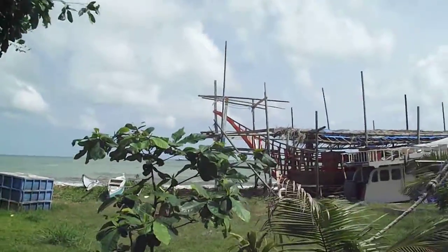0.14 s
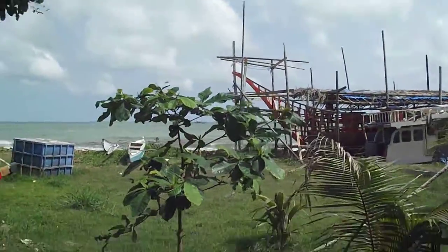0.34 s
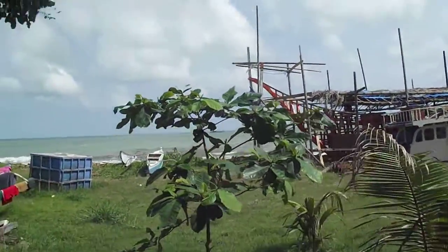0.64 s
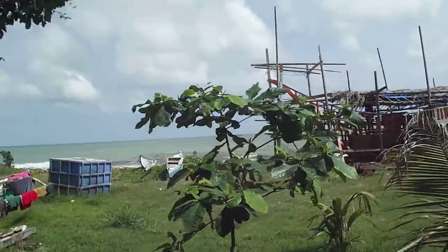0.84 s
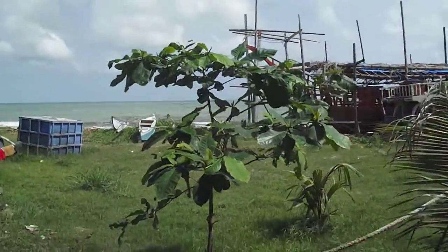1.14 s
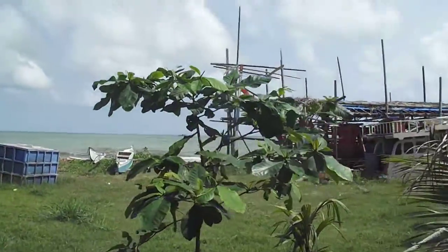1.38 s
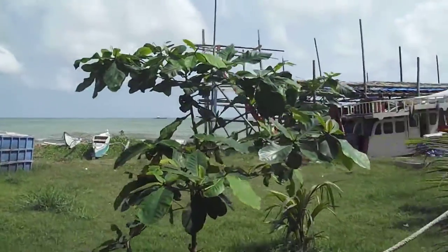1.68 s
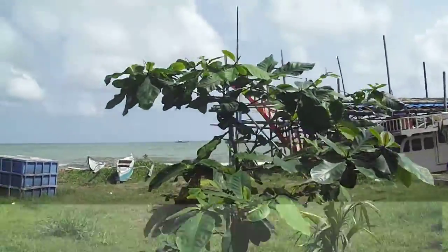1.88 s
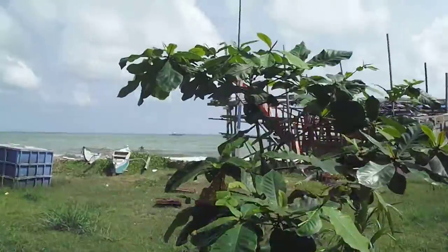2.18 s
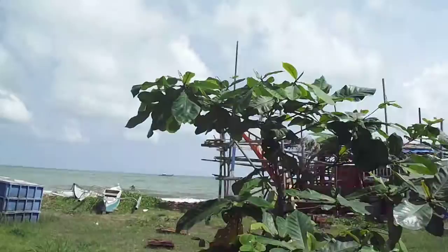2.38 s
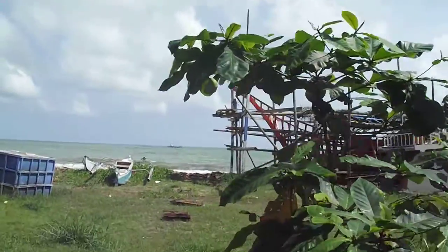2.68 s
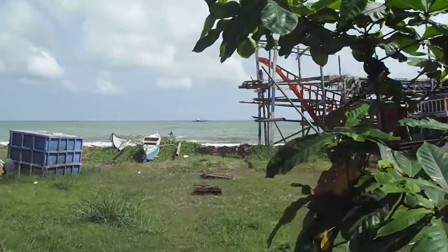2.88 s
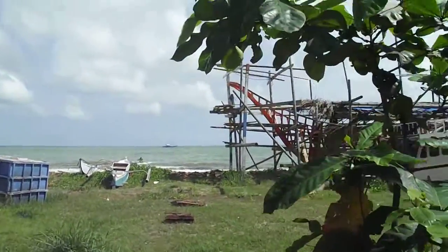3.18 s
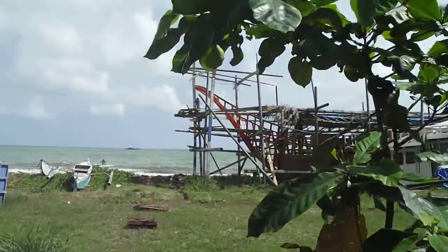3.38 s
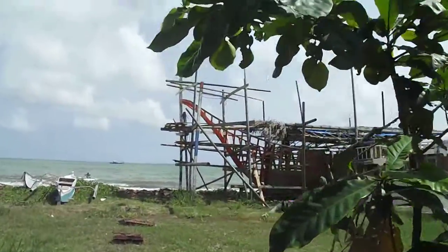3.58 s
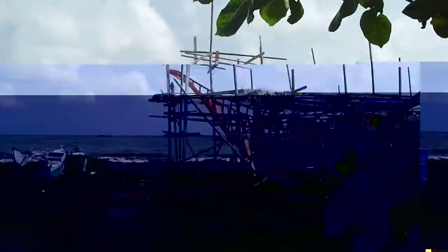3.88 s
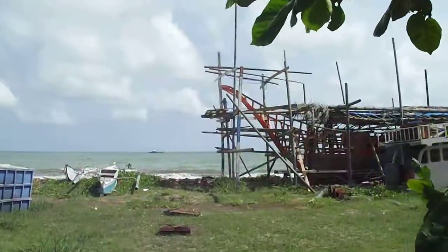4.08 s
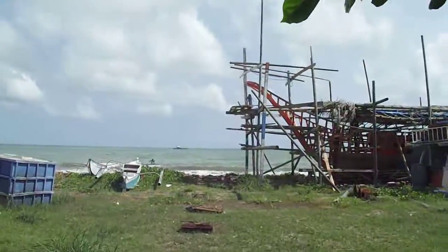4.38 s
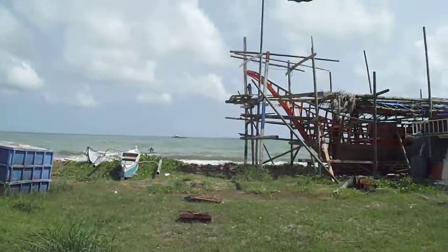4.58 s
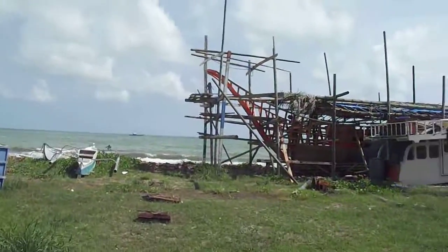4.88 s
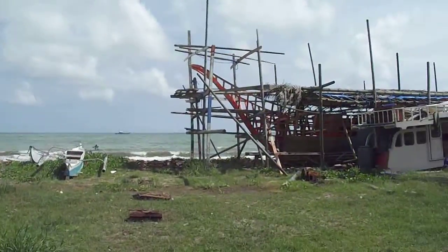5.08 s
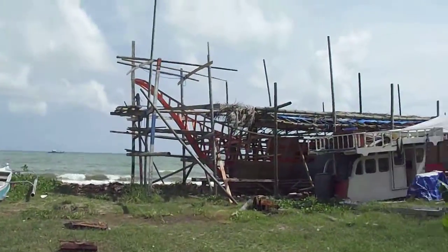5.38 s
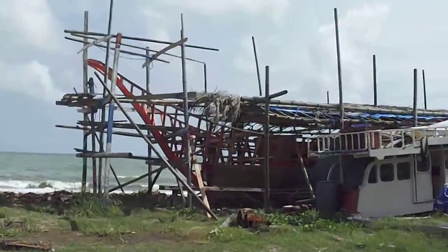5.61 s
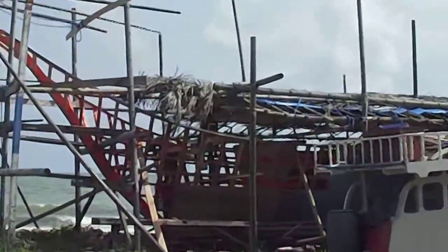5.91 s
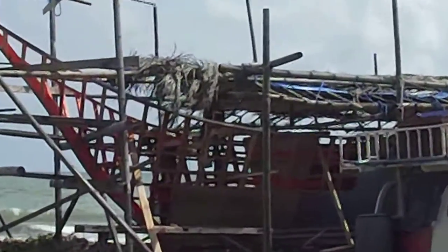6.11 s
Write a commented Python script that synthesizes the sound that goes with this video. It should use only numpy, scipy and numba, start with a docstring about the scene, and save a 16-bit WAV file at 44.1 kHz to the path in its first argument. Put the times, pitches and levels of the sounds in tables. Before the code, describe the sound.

Beside the shore, hammering cracks on boat timber every 0.6 seconds, then stops, leaving steady surf, a piercing drone and fingers clicking and rubbing the microphone's casing.

```python
"""Hammering on a wooden hull by the shore

Someone hammers on the timbers: ringing modes, a noisy crack and a short tail of scattered echoes.
Surf is shaped noise with a high drone from the ringing microphone port; wind is low rumble and thumps.
Fingers rub, click and squeak on the small camera: bursts of tiny slips ring its casing, squeaks are tones.
The camera's gain control ducks after loud knocks, and peaks above full scale are cut flat."""
import sys
import numpy as np
from scipy import signal
from scipy.fft import rfft, irfft, next_fast_len
from scipy.io import wavfile
from scipy.ndimage import uniform_filter1d
from numba import njit

SR = 44100
rng = np.random.default_rng(int(sys.argv[2]) if len(sys.argv) > 2 else 0)


def materialize(psi):
    """Save the field psi as 16-bit PCM at rate SR to the path in sys.argv[1].

    A 1-D psi becomes a single channel; in a 2-D psi each row is a channel.
    """
    bounded = np.clip(np.atleast_2d(psi).T, -1, 1)
    quanta = np.round(bounded * 32767).astype(np.int16)
    wavfile.write(sys.argv[1], SR, quanta)


N = 275625
TIME = np.arange(N) / SR  # seconds

# the bright edge of finger noise: pitch_hz [Hz], level_db [dB, relative]
EDGE_SPECTRUM = [(3000, -11), (4200, 8.5), (5000, -9.5), (5550, 6.5), (6200, -3), (7200, 1), (8100, 11.5),
                 (9700, -7), (12000, -11.5), (16000, -21)]
PRESS_HZ, PRESS_WIDTH_HZ = 2680, 2380  # the band that a fingertip excites


def undb(db):
    """Turn decibels into a gain."""
    return 10 ** (np.asarray(db) / 20)


def unit(x):
    """Scale to an rms (average strength) of 1."""
    return x / np.sqrt(np.mean(x ** 2) + 1e-18)


def curve(rows):
    """Join (time in s, value) rows by straight lines."""
    return np.interp(TIME, *np.transpose(rows))


def add(out, start_s, x):
    """Mix x into out from start_s, dropping what runs past the end."""
    i = max(int(start_s * SR), 0)
    out[i:i + len(x)] += x[:max(N - i, 0)]


def colour(x, points):
    """Give x a spectrum of (Hz, dB) points, with a filter that responds only after its input."""
    size = next_fast_len(len(x) + 4096, True) * 2
    points_hz, points_db = np.transpose(points)
    bins_hz = np.arange(size // 2 + 1) * SR / size
    gain = undb(np.interp(np.log(bins_hz + 1), np.log(points_hz), points_db))
    # folding the cepstrum (transform of the log gain) forward gives the filter its timing
    cepstrum = irfft(np.log(gain))
    cepstrum[1:size // 2] *= 2
    cepstrum[size // 2 + 1:] = 0
    response = np.exp(rfft(cepstrum))
    return irfft(rfft(x, size) * response)[:len(x)]


def resonate(x, hz, width_hz):
    """One resonance, with gain 1 at its centre."""
    return signal.lfilter(*signal.iirpeak(hz, hz / width_hz, fs=SR), x)


def highpass(x, hz, order):
    """Weaken what lies below hz."""
    return signal.sosfilt(signal.butter(order, hz, "high", fs=SR, output="sos"), x)


def walk(rate_hz):
    """Random drift between new values, about rate_hz of them a second, with a spread near 1."""
    step = int(SR / rate_hz)
    stairs = np.repeat(rng.standard_normal(N // step + 1), step)[:N]
    return uniform_filter1d(stairs, step)


def swell(centre_s, length_s):
    """A smooth rise and fall around centre_s."""
    return np.exp(-(2 * (TIME - centre_s) / length_s) ** 2)


def surf(level_db=-21.5, drone_db=-2):
    """Steady far hiss with a heaving bass; noise also keeps the microphone port ringing as a drone."""
    # surf and leaves: pitch_hz [Hz], level_db [dB, relative]
    hiss_spectrum = [(30, -14.5), (110, 3), (160, 9), (215, -3.5), (320, -3), (470, -15), (680, -8),
                     (1100, -11), (2400, -5.5), (3400, -8.5), (4200, -20), (5400, -35), (7000, -26),
                     (9200, -28.5), (11000, -46.5), (15700, -43)]
    # resonances of the microphone port: pitch_hz [Hz], width_hz [Hz], level_db [dB, relative]
    port_modes = [(2849, 117, 9.5), (2961, 95, 8.5), (7980, 500, -14)]
    wash = unit(colour(rng.standard_normal(N), hiss_spectrum))
    treble = highpass(wash, 480, order=1)
    bass = wash - treble
    wash = bass * undb(walk(13)) + treble * undb(.5 * walk(4))
    air = rng.standard_normal(N)
    drone = np.zeros(N)
    for hz, width_hz, db in port_modes:
        narrow = resonate(air, hz, width_hz)
        drone += undb(db) * resonate(narrow, hz, 5 * width_hz)
    drone = undb(drone_db) * unit(drone) * undb(.5 * walk(29))
    return (wash + drone) * undb(level_db)


def wind(flutter_db=1.5):
    """A dying breeze with gusts rumbles on the microphone; eddies reach higher, pressure dips thump."""
    # the breeze, dying down unevenly: time_s [s], level_db [dB]
    breeze = [(0, -22), (1.1, -15.5), (2.5, -24.5), (3.3, -24), (3.7, -33), (4.7, -28), (5.1, -58),
              (6.25, -38)]
    # gusts on top of it: centre_s [s], rise_db [dB], length_s [s]
    gusts = [(0.296, 6, 0.18), (1.142, 2.5, 0.23), (2.038, 0.5, 0.28), (3.386, 13, 0.051)]
    # the rumble: pitch_hz [Hz], level_db [dB, relative]
    rumble_spectrum = [(8, -32), (24, 2), (60, -4), (120, -7), (200, -18), (320, -39), (500, -30),
                       (1000, -40.5), (3000, -70)]
    # eddies that tear at the port: centre_s [s], level_db [dB], length_s [s]
    eddies = [(0.34, -20.5, 0.09), (0.61, -31, 0.32), (0.886, -7.5, 0.082), (1.02, -17, 0.17),
              (1.156, -17.5, 0.071), (1.69, -27.5, 0.36), (2.914, -26, 0.011), (2.966, -8, .012)]
    # the sound of an eddy: pitch_hz [Hz], level_db [dB, relative]
    tearing_spectrum = [(30, -11.5), (110, 4), (300, -3.5), (480, -20), (800, -19.5), (3000, -50.5)]
    # wind thumps: centre_s [s], depth_db [dB, before the high-pass], width_s [s, each side]
    thumps = [(.323, 2, 0.00048), (0.907, -17, 0.00066), (2.872, 6.5, 0.0018), (2.966, 20.5, 0.001)]
    strength_db = curve(breeze) + flutter_db * walk(21.68)
    for centre_s, rise_db, length_s in gusts:
        strength_db += rise_db * swell(centre_s, length_s)
    out = unit(colour(rng.standard_normal(N), rumble_spectrum)) * undb(strength_db)
    tearing = unit(colour(rng.standard_normal(N), tearing_spectrum))
    for centre_s, db, length_s in eddies:
        out += undb(db) * tearing * swell(centre_s, length_s)
    dips = np.zeros(N)
    for centre_s, depth_db, width_s in thumps:
        dips -= undb(depth_db) * np.exp(-np.abs(TIME - centre_s) / width_s)
    return out + highpass(dips, 29, order=1)


def casing(force):
    """The small shell rings in a few modes and carries little bass."""
    # casing resonances: pitch_hz [Hz], width_hz [Hz], level_db [dB, relative]
    shell_modes = [(1681, 84, 3.5), (2294, 124, 3), (2797, 123, 8), (3162, 286, 1.5), (3984, 125, -3),
                   (4290, 235, -5), (5600, 64, -19), (6900, 760, -55)]
    ring = np.zeros(len(force))
    for k, (hz, width_hz, db) in enumerate(shell_modes):
        ring += (-1) ** k * undb(db) * resonate(force, hz, width_hz)  # signs alternate
    return highpass(ring, 1310, order=6)


def slips(count):
    """Dense tiny slips of skin, of very unequal size."""
    size_db = 3 * rng.exponential(size=count).clip(0, 4)
    present = rng.random(count) < .25  # about a quarter of the samples hold a slip
    return rng.standard_normal(count) * undb(size_db) * present


def squeaks():
    """The grip squeaks briefly: a pure tone near the lowest mode of the casing swells and fades."""
    # squeaks: start_s [s], level_db [dB], length_s [s], pitch_hz [Hz]
    squeak_rows = [(4.72, -2, 0.01, 1673), (4.732, 2, 0.0062, 1700)]
    out, t = np.zeros(N), TIME[:SR // 20]
    for start_s, db, length_s, hz in squeak_rows:
        loudness = np.sin(np.pi * np.minimum(t / length_s, 1))
        add(out, start_s, undb(db) * np.sin(2 * np.pi * hz * t) * loudness)
    return out


def rubs(catch_gap_s=0.012, catch_decay_s=.003, catch_spread_db=0.5, slide_db=-14):
    """Sliding skin catches and lets go at uneven intervals; each release rattles the casing."""
    # slides: start_s [s], end_s [s], level_db [dB], treble_db [dB, relative to the body]
    slides = [(1.046, 1.265, -14, -20.5), (1.867, 1.98, -14.5, -17.5), (2.475, 2.515, -7.5, -18.5),
              (3.147, 3.179, -11.5, -21), (3.546, 3.635, -8.5, -22), (4.165, 4.258, -8, -23),
              (4.346, 4.37, -19.5, -31), (4.424, 4.474, -10.5, -20), (4.47, 4.593, -21, -16),
              (4.716, 4.744, -14.5, -23), (4.862, 4.877, -17.5, -14), (4.935, 4.956, -6, -8.5)]
    out = np.zeros(N)
    for start_s, end_s, db, treble_db in slides:
        t = TIME[:int((end_s - start_s) * SR)]
        jitter, size = rng.uniform(-1, 1, (64, 2)).T
        catches_s = catch_gap_s * (np.arange(len(jitter)) + (jitter - jitter[0]) / 2)
        last = np.searchsorted(catches_s, t, "right") - 1  # the latest catch at each moment
        release = np.exp(-(t - catches_s[last]) / catch_decay_s)
        # steady friction goes on between the catches
        grip = undb(slide_db) + undb(catch_spread_db * size[last]) * release
        fade_out = np.minimum(1, (t[-1] - t) / 0.0087)
        force = slips(SR)[:len(t)] * grip * fade_out
        body = casing(resonate(force, PRESS_HZ, 2 * PRESS_WIDTH_HZ))
        edge = highpass(colour(force, EDGE_SPECTRUM), 1800, order=4)
        add(out, start_s, undb(db) * (unit(body) + undb(treble_db) * unit(edge)))
    return out


def clicks():
    """A fingertip snaps off the casing in a short burst of slips."""
    # clicks: start_s [s], level_db [dB, before the length scaling], length_s [s],
    # treble_db [dB, relative to the body]
    snaps = [(0.891, -11, 0.004, -26), (0.969, -9, 0.0057, -21), (1.075, -9.5, .003, -17),
             (1.113, -8, 0.0093, -15), (1.172, -3.5, 0.0067, -16.5), (1.198, -7.5, .002, -10),
             (1.228, -6.5, 0.0074, -23), (1.796, -4, 0.0019, -6.5), (1.84, -6.5, .005, -23),
             (1.919, 1.5, 0.014, -25), (2.345, -11.5, 0.0025, -26), (2.441, -10.5, 0.0072, -19),
             (2.471, -13.5, 0.0027, -7), (2.977, -2.5, 0.0031, -0.5), (3.034, -2.5, 0.0043, -25),
             (3.057, 1.5, 0.0078, -17), (3.072, 3.5, 0.0054, -33), (3.088, 2, 0.0027, -31),
             (3.115, -1, 0.0094, -21), (3.541, 6, 0.0021, -19.5), (3.583, 1.5, 0.0044, -21),
             (4.163, 1, 0.0019, -16), (4.195, -2, 0.0047, -23), (4.211, -6, .004, -23),
             (4.232, 0.5, 0.0052, -18), (4.268, 8, 0.0084, -23), (4.314, -8.5, 0.0044, -41),
             (4.43, -17, 0.0062, -21), (4.776, -1, 0.0018, -9), (4.818, -0.5, 0.002, -25),
             (4.841, -10, 0.0016, -11), (4.931, -1, 0.0017, -10), (5.401, -2, 0.0021, -9.5),
             (5.431, -5.5, 0.006, -23), (5.459, -10, .002, -14), (6.002, -2.5, 0.0023, -3.5),
             (6.113, -10, 0.0074, -16.5), (6.17, -3.5, 0.0084, -18)]
    out, t = np.zeros(N), TIME[:SR // 20]
    for start_s, db, length_s, treble_db in snaps:
        force = slips(len(t)) * np.exp(-(t / length_s) ** 2) + 2 * (t == 0)  # opens with one push
        body = casing(resonate(force, PRESS_HZ, PRESS_WIDTH_HZ))
        edge = colour(force * np.exp(-t / length_s), EDGE_SPECTRUM)  # the first slips are the sharpest
        click = unit(body) + undb(treble_db) * unit(highpass(edge, 1200, order=4))
        length_gain = np.sqrt((length_s + .0025) / t[-1])  # a longer burst carries more energy
        add(out, start_s, undb(db) * click * length_gain)
    return out


def hammer(contact_s=.005, hull_t60_s=.28, onset_s=.0007):
    """Each blow cracks and rings the timber; hull and scaffold scatter it into a short, uneven tail."""
    # blows: start_s [s], level_db [dB], crack_db and hull_db [dB, relative to the ring],
    # favoured_hz [Hz]
    blows = [(0.044, 0.5, -4, -3.5, 930), (0.6567, 3, -1, -4.5, 880), (1.2628, -1.5, -0.5, -2, 970),
             (1.864, -4, -6, -9, 734), (4.722, -16.5, -30, -7, 1270), (4.8213, -21.5, -17, -16, 1320),
             (6.1884, -15, -24, 5, 500)]
    # modes of the struck timber: pitch_hz [Hz], level_db [dB, relative], t60_s [s, to fall by 60 dB]
    timber_modes = [(648.5, 7, 0.072), (716, 2, 0.05), (770, 2.5, 0.025), (868, 12, 0.034), (953, -8, 0.13),
                    (1121, 6, 0.061), (1246, -3, 0.15), (1294, 8, 0.038), (1397, 2, 0.098),
                    (1700, 0, 0.056)]
    # the crack of the hammer head: pitch_hz [Hz], level_db [dB, relative]
    crack_spectrum = [(300, -21), (800, -2), (1300, -27), (1800, -2), (2850, 14), (3500, -11.5),
                      (9000, -34)]
    # the blow scattered by hull and scaffold: pitch_hz [Hz], level_db [dB, relative]
    hull_spectrum = [(200, 9.5), (480, -8.5), (640, 1), (860, -1), (1100, -2), (1300, -2.5), (1600, -3.5),
                     (2400, -5), (2850, -1), (4000, -27), (8000, -79)]
    out, t = np.zeros(N), TIME[:SR // 2]
    first = slice(0, SR // 125)  # ring and crack are balanced over the first 8 ms
    onset = 1 - np.exp(-t / onset_s)
    for start_s, db, crack_db, hull_db, favoured_hz in blows:
        modes = np.zeros(len(t))
        for hz, mode_db, t60_s in timber_modes:
            blow_hz = hz * (1 + 0.0015 * rng.standard_normal())  # slightly different at each blow
            tone = np.sin(2 * np.pi * blow_hz * t + rng.uniform(0, 2 * np.pi))
            modes += undb(mode_db) * tone * undb(-60 * t / t60_s)
        ring = resonate(modes, favoured_hz, favoured_hz)  # where the hammer lands favours some modes
        crack = colour(rng.standard_normal(len(t)) * np.exp(-t / contact_s), crack_spectrum)
        echoes = rng.standard_normal(len(t)) * (rng.random(len(t)) < .06)  # sparse reflections
        scattered = resonate(colour(echoes, hull_spectrum), favoured_hz, 2 * favoured_hz)
        tail = unit(scattered) * undb(-60 * t / hull_t60_s)
        blow = ring / ring[first].std()
        blow += undb(crack_db) * crack / crack[first].std()
        blow += undb(hull_db) * tail
        add(out, start_s, undb(db) * blow * onset)
    return out


def scene():
    """Everything that reaches the one microphone."""
    return (surf() + wind() + squeaks() + rubs() + clicks() + hammer())[None]


@njit
def follow(x, attack, release):
    """Loudness envelope: each sample closes a share of the gap, by attack going up, release going down."""
    out, level = np.empty(len(x)), 0.
    for i in range(len(x)):
        level += (x[i] - level) * (attack if x[i] > level else release)
        out[i] = level
    return out


def record(dry, knee_db=-23, attack_s=.011, release_s=0.14, squeeze=0.49, makeup_db=1.0, top_hz=15750):
    """Gain control ducks after loud knocks, the converter cuts peaks flat, and the top is filtered off."""
    envelope = follow(np.abs(dry[0]), 1 / (attack_s * SR), 1 / (release_s * SR))
    excess = np.maximum(envelope / undb(knee_db), 1)  # only loudness above the knee counts
    ducked = undb(makeup_db) * dry / excess ** squeeze
    lowpass = signal.ellip(8, .2, 70, top_hz, fs=SR, output="sos")
    return signal.sosfilt(lowpass, np.clip(ducked, -1, 1))


dry = scene()
out = record(dry)
materialize(out)
```